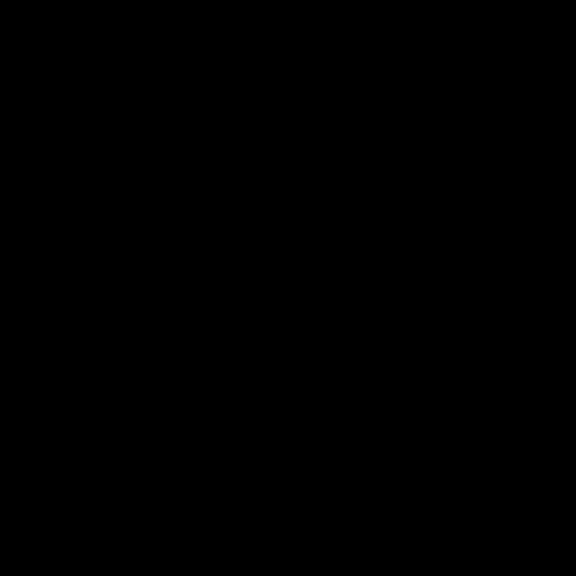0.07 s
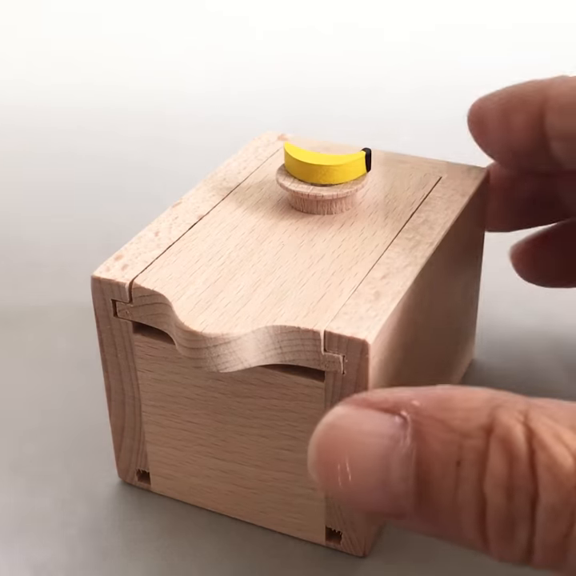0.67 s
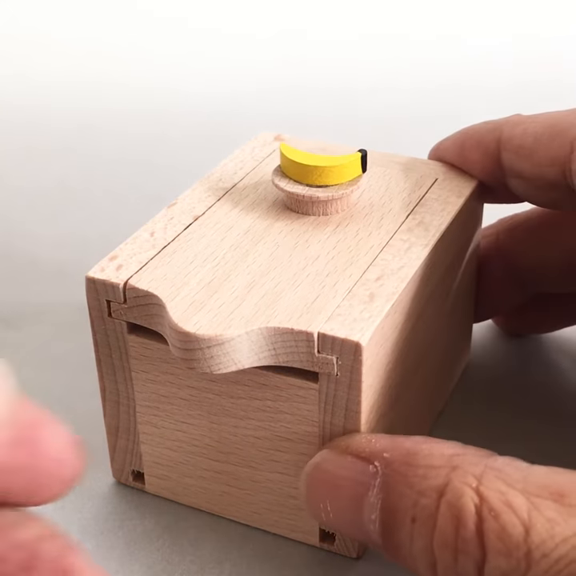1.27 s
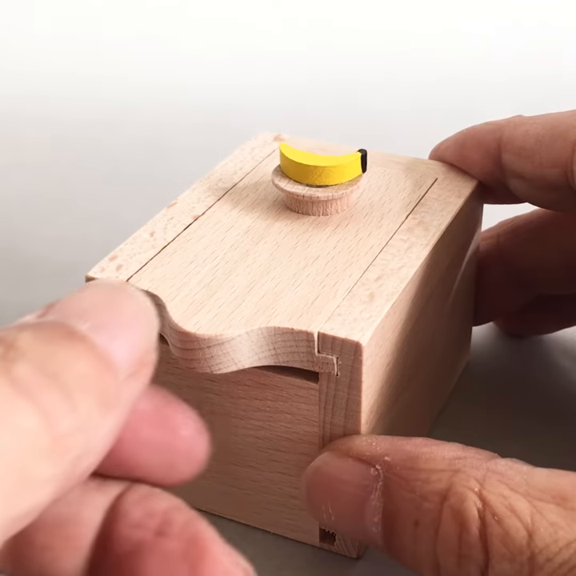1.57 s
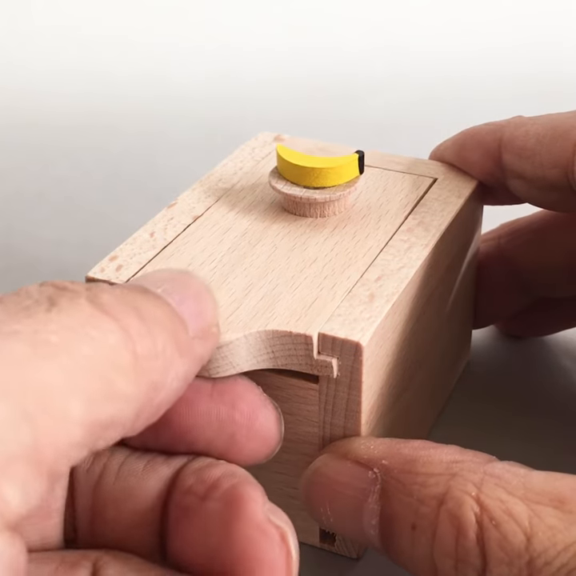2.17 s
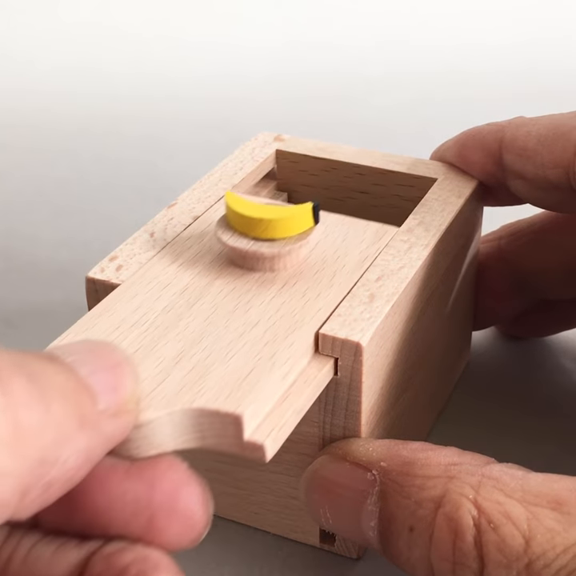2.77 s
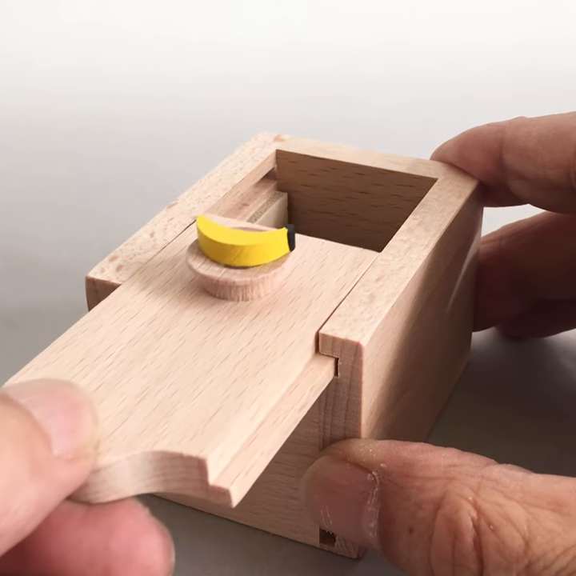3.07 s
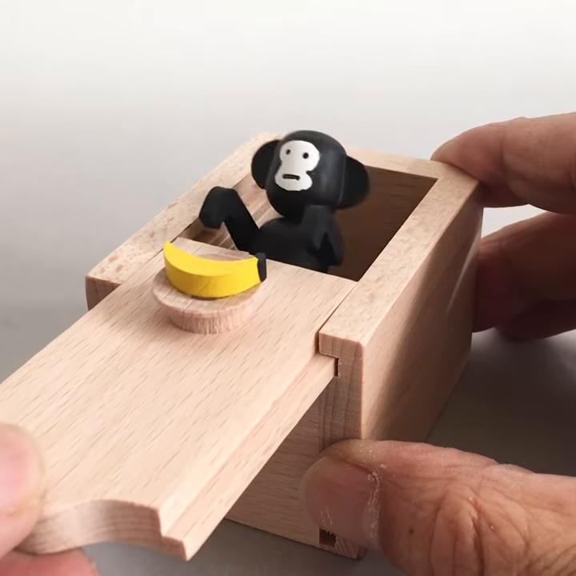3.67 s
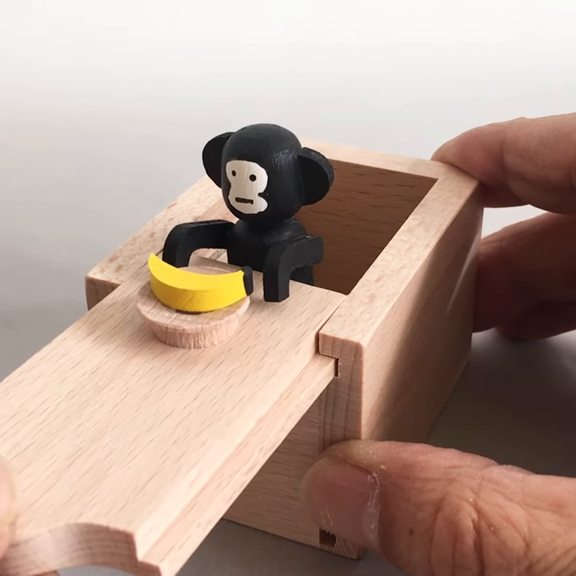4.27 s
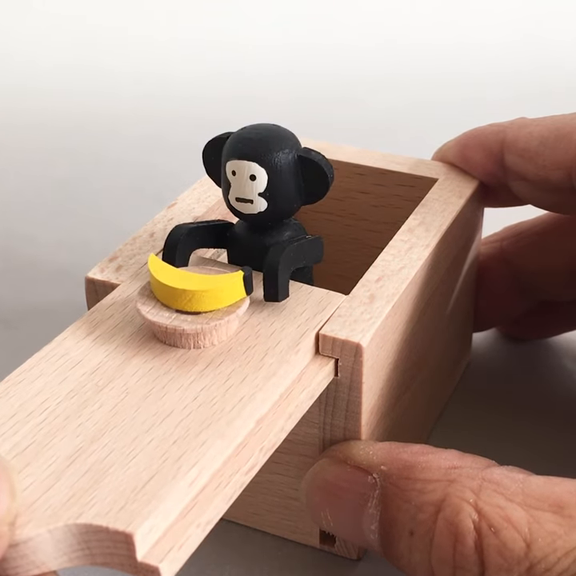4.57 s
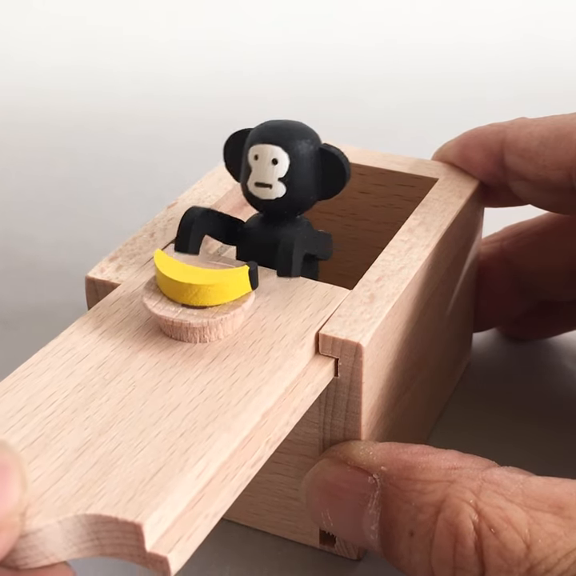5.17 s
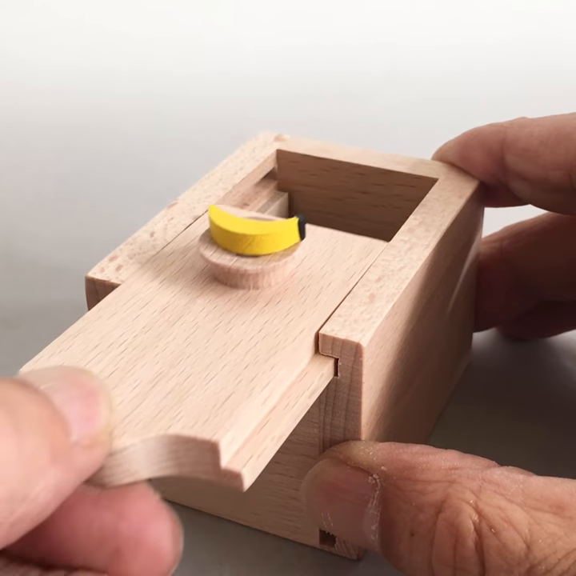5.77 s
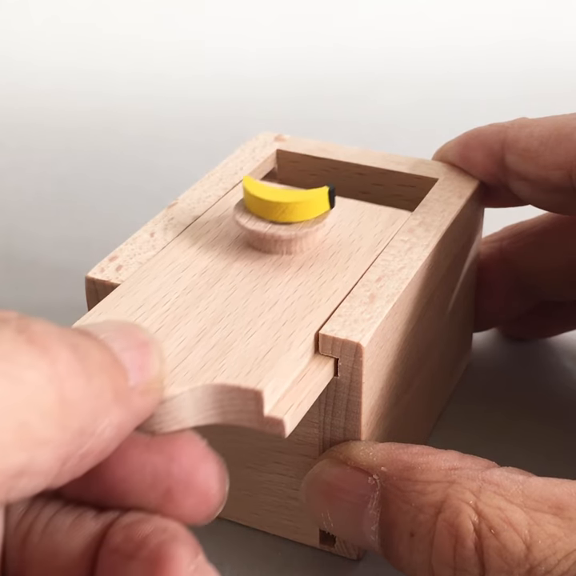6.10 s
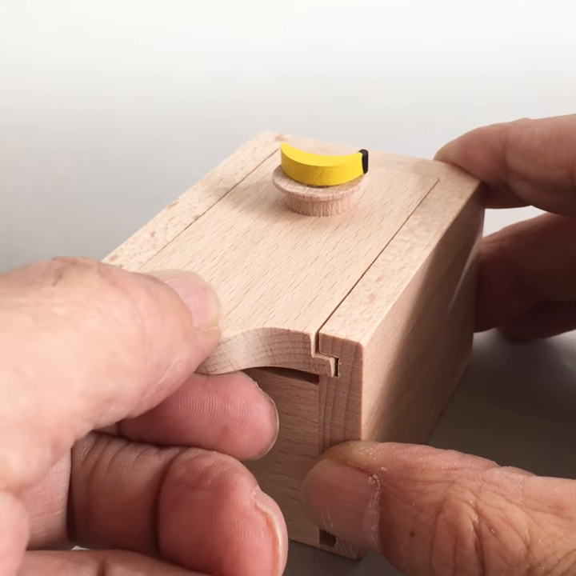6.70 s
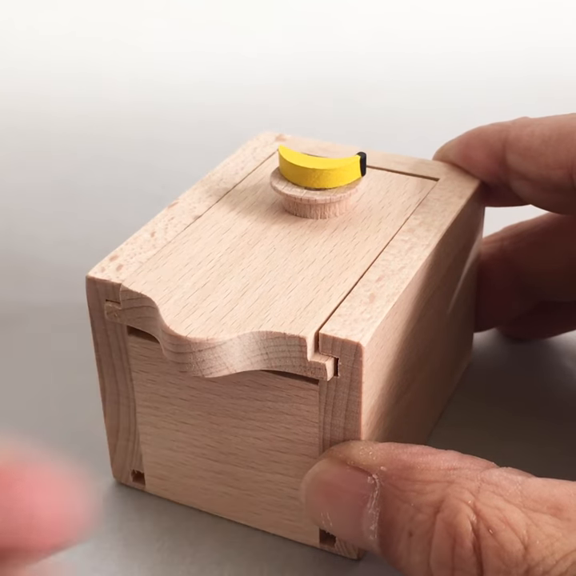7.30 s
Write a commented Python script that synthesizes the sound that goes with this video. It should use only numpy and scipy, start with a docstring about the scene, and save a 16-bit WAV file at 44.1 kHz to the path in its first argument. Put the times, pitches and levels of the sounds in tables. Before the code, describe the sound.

A quiet room's faint hush fades in. From about 0.6 seconds, fingers brush and grip a small wooden box close to the microphone, with light scuffs. Around 2 seconds the lid gives a soft bump, then slides open with a dry wooden rubbing, strongest between 2.5 and 3 seconds. At 3.5 seconds a toy figure pops up with a clear knock, followed by small taps and ticks of its joints until about 4.2. The holding hands make a soft, low rumble. From 5.3 seconds the lid slides back, and at 5.7 the figure drops inside with a sharp clack, by far the loudest sound, briefly overloading the microphone. The rubbing continues until the lid shuts with light bumps near 6.7 seconds. Another small tap comes at 7.1, and the hand brushes away.

```python
"""A quiet room's hush fades in, and fingers brush and grip a small wooden trick box close by on a table.
The lid slides open, friction in its grooves exciting the modes of the wood, and a toy figure swings up
with a knock and small ticks of its joints. The lid is pushed back, the figure drops in with an impact
loud enough to overload the microphone, the lid shuts and the hand brushes away."""
import sys
import numpy as np
from scipy import signal
from scipy.fft import rfft, irfft, next_fast_len
from scipy.io import wavfile

SR = 44100
rng = np.random.default_rng(int(sys.argv[2]) if len(sys.argv) > 2 else 0)


def digitize_waveform(pressure):
    """Quantize a signal to 16-bit integers and store it at the path in sys.argv[1].

    Rows of a 2-D input are taken as channels; values are limited to [-1, 1].
    """
    field = np.atleast_2d(pressure).T
    bounded = np.clip(field, -1, 1)
    quanta = np.round(bounded * 32767).astype(np.int16)
    wavfile.write(sys.argv[1], SR, quanta)


N = 323694
TIME = np.arange(N) / SR
RING_TIME = np.arange(SR // 3) / SR


def from_db(db):
    """Amplitude ratio of a level in decibels."""
    return 10 ** (np.asarray(db) / 20)


def rms_one(x):
    """Normalisation to unit rms."""
    return x / np.sqrt(np.mean(x ** 2) + 1e-20)


def cut(x, hz, kind, order=2):
    """Butterworth low- or high-pass filtering."""
    return signal.sosfilt(signal.butter(order, min(hz, .45 * SR), kind, fs=SR, output="sos"), x)


def split(x, hz, order):
    """Zero-phase crossover: the parts below and above hz, each at unit rms."""
    forward = cut(x, hz, "low", order)
    low = cut(forward[::-1], hz, "low", order)[::-1]
    return rms_one(low), rms_one(x - low)


def coloured(x, spectrum):
    """Spectral weighting, falling 20 dB per octave beyond the table's ends; unit rms."""
    hz, db = np.transpose(spectrum)
    size = next_fast_len(N)
    octave = np.log2(np.maximum(np.fft.rfftfreq(size, 1 / SR), 1))
    known = np.log2(hz)
    beyond = np.abs(octave - np.clip(octave, known[0], known[-1]))
    gain = from_db(np.interp(octave, known, db) - 20 * beyond)
    return rms_one(irfft(rfft(x, size) * gain, size)[:N])


def shaped(x, bands):
    """Resonance and antiresonance: narrow bands are raised or lowered."""
    for hz, width_hz, db in bands:
        x = x + (from_db(db) - 1) * signal.lfilter(*signal.iirpeak(hz, hz / width_hz, fs=SR), x)
    return x


def resonance(x, hz, width_hz):
    """Forced response of a resonator whose natural frequency may move; unit rms."""
    carrier = np.exp(2j * np.pi * np.cumsum(hz) / SR)
    return rms_one(np.real(carrier * cut(x / carrier, width_hz / 2, "low")))


def disperse(x, hz, width_hz):
    """Dispersion of bending waves: an all-pass filter delays those near hz."""
    radius = np.exp(-np.pi * width_hz / SR)
    poles = [1, -2 * radius * np.cos(2 * np.pi * hz / SR), radius * radius]
    return signal.lfilter(poles[::-1], poles, x)


def flicker(per_s, spread_db):
    """Random amplitude modulation: a gain that wanders about unity."""
    steps = rng.standard_normal(4096)
    wander = rms_one(np.interp(TIME * per_s, np.arange(len(steps)), steps))
    return from_db(spread_db * wander)


def stick_slip(per_s, spread_db):
    """Stick-slip friction as a Poisson train of uneven impulses; unit rms."""
    impulses = (rng.random(N) < per_s / SR) * rng.standard_normal(N)
    return rms_one(impulses * from_db(spread_db * np.clip(rng.standard_normal(N), -2, 2)))


def decay(t60):
    """Exponential damping by 60 dB in t60 seconds."""
    return from_db(-60 * RING_TIME / t60)


def ring(modes, vary_db):
    """Superposition of damped modes; each blow shares its force differently among them."""
    hz, db, t60 = np.transpose(modes)[:, :, None]
    strength = from_db(db + vary_db * rng.standard_normal(db.shape))
    return np.sum(strength * decay(t60) * np.cos(2 * np.pi * hz * RING_TIME), axis=0)


def add(track, s, sound, level_db):
    """Superposition of a transient at time s, scaled by the rms of its first 10 ms."""
    start = int(s * SR)
    part = sound[:N - start]
    track[start:start + len(part)] += from_db(level_db) * part / np.std(sound[:SR // 100])


def stroke_gain(rows):
    """Amplitude envelope of a stroke, closing within 3 ms beyond its ends."""
    s, db = np.transpose(rows)
    gate = np.clip(1 + np.minimum(TIME - s[0], s[-1] - TIME) / .003, 0, 1)
    return gate * from_db(np.interp(TIME, s, db))


def swells(rows):
    """Raised-cosine envelopes, with widths at half height; one gain curve per level column."""
    gains = 0
    for s, width, *db in rows:
        bell = np.cos(np.pi / 2 * np.clip((TIME - s) / width, -1, 1)) ** 2
        gains = gains + np.outer(from_db(db), bell)
    return gains


# Spectrum of the room's hush: f/Hz, relative level/dB
HUSH_SPECTRUM = [(12, -43), (20, -24), (49, 4.5), (70, -2.5), (162, -10), (221, -7), (292, -9),
                 (431, -14.5), (843, -20), (969, -19.5), (1280, -23), (2300, -23.5), (4890, -28),
                 (9300, -30), (15800, -34.5)]
def room_hush(level_db=-45.5):
    """Stationary ambient noise, strongest in the bass."""
    return from_db(level_db) * coloured(rng.standard_normal(N), HUSH_SPECTRUM)


def reflections(x, wet_db, t60, wall_hz, delay_s):
    """Reverberation: the table and near walls return a short, dull, diffuse tail."""
    onset = np.clip(RING_TIME / delay_s - 1, 0, 1)
    tail = rng.standard_normal(len(RING_TIME)) * decay(t60) * onset
    tail = cut(tail / np.linalg.norm(tail), wall_hz, "low", order=1)
    return from_db(wet_db) * signal.fftconvolve(x, tail)[:N]


# Low swells of the holding hands shifting, and the loud clack's thump: centre t/s, width/s, level/dB
RUMBLE_SWELLS = [(0.69, 0.051, -49), (0.93, 0.5, -51.5), (1.7, .08, -46), (1.88, 0.055, -48),
                 (2.0, 0.056, -50), (4.01, .08, -40), (4.15, 0.072, -36), (4.35, .3, -47),
                 (4.56, 0.093, -32), (4.75, 0.096, -33.5), (4.87, 0.077, -37.5), (5.15, 0.086, -35.5),
                 (5.28, 0.089, -40), (5.4, 0.19, -46), (5.71, 0.076, -39.5), (7.17, 0.043, -30.5),
                 (7.28, 0.11, -41.5)]
# Spectrum of the rumble: f/Hz, relative level/dB
RUMBLE_SPECTRUM = [(30, -22), (55, -8.5), (75, -1), (95, 0.5), (125, -9.5), (160, -11), (280, -24),
                   (380, -22), (520, -35.5)]
def low_rumble(hold_db=-53.5):
    """Compliant contact: soft hands transmit only a low rumble; one swell is the loud clack's thump."""
    swell, = swells(RUMBLE_SWELLS)
    return (from_db(hold_db) + swell) * coloured(rng.standard_normal(N), RUMBLE_SPECTRUM)


# High resonances of the thin boards: f/Hz, bandwidth/Hz, gain/dB
BOARD_RESONANCES = [(1160, 90, 4.5), (2315, 180, 3.5), (3740, 320, 3), (4550, 200, 4), (5630, 420, 3.5),
                    (6400, 550, 2.5), (9350, 500, 1)]
def rubbed(spectrum):
    """Roughness noise: countless fine slips merge into a hiss coloured by the boards; unit rms."""
    return coloured(shaped(rng.standard_normal(N), BOARD_RESONANCES), spectrum)


# Hiss of the moving skin, standing for its speed, one curve a stroke: t/s, level/dB
SKIN_STROKES = [
    [(0.604, -40), (0.644, -52), (0.734, -35), (0.892, -36.5), (1.112, -30.5), (1.42, -31.5), (1.526, -37),
     (1.71, -34), (1.878, -42.5), (1.942, -58), (1.95, -48)],
    [(7.12, -42), (7.124, -38.5), (7.2, -31.5), (7.222, -27.5), (7.292, -27.5), (7.34, -31)],
]
# Initial pressure of each stroke: relative level/dB
SKIN_PRESSURES = [1, -3]
# Spectrum of skin on wood: f/Hz, relative level/dB
SKIN_SPECTRUM = [(500, -12.5), (1100, -8), (1400, -6.5), (2000, -3.5), (3500, -3), (6000, 0.5), (7800, 1),
                 (9300, 3), (12000, 0.5), (15800, -8)]
def brushing(rub_db=-14, ease_db_per_s=5, rub_exponent=0.65):
    """Sliding friction of skin: hiss grows with speed faster than the dull rub, whose pressure eases."""
    rub, hiss = 0, 0
    for stroke, pressure_db in zip(SKIN_STROKES, SKIN_PRESSURES):
        speed = stroke_gain(stroke)
        age = np.maximum(TIME - stroke[0][0], 0)
        hiss = hiss + speed
        rub = rub + speed ** rub_exponent * from_db(rub_db + pressure_db - ease_db_per_s * age)
    slips = rubbed(SKIN_SPECTRUM) * flicker(per_s=30, spread_db=1.4)
    dull, fine = split(slips, hz=3740, order=2)
    smooth, sharp = split(fine, hz=10800, order=2)
    lightness = np.minimum(hiss / (rub + 1e-9), 3)   # a light, fast stroke sharpens the very top
    return rub * dull + hiss * (from_db(-1.43) * smooth + from_db(-9) * lightness * sharp)


# Modes of box and lid: f/Hz, relative level/dB, T60/s
BOX_MODES = [(245, -20, 0.15), (325, -25, 0.24), (402, -19.5, 0.12), (489, -20, 0.071), (592, -10.5, 0.049),
             (702, -20.5, 0.089), (902, -5, 0.011), (1154.5, 1, 0.025), (1272, -9, 0.037),
             (1383, -4.5, 0.021), (1468, -6, 0.032), (1580, -4.5, 0.016), (1704, -14, 0.058),
             (2046, -13, 0.026), (2360, -6.5, 0.0097), (2835, -6.5, 0.0091), (3390, -10.5, 0.0049),
             (3900, -5.5, 0.012), (6130, -3, 0.0041), (7440, 11.5, 0.0064)]
def box_ring(vary_db):
    """Impulse response of the box: free vibration of its normal modes."""
    return ring(BOX_MODES, vary_db)


# Rubbing, standing for the lid's speed as it is nudged, pulled out and pushed back: t/s, level/dB
LID_STROKES = [
    [(2.113, -46.5), (2.16, -49.5), (2.21, -59), (2.28, -51), (2.335, -61)],
    [(2.33, -60.5), (2.41, -46.5), (2.46, -45.5), (2.51, -41.5), (2.64, -35.5), (2.8, -35.5), (2.89, -38.5),
     (3.0, -43), (3.16, -49), (3.52, -45), (3.76, -51.5), (4.08, -51), (4.19, -55)],
    [(5.28, -56.5), (5.48, -43), (5.72, -38), (5.98, -40.5), (6.08, -38), (6.27, -38), (6.35, -41),
     (6.53, -47), (6.66, -47), (6.74, -69.5)],
]
# Travel of the lid: t/s, fraction drawn out
LID_TRAVEL = [(2.35, 0), (2.58, 0.07), (2.7, .35), (3.0, 0.78), (3.7, 1), (5.3, 0.8), (5.8, 0.75),
              (6.2, 0.39), (6.5, .16), (6.65, 0.04)]
# Scuffs as the box shifts or lid and figure catch: centre t/s, width/s, ring level/dB, drag level/dB
WOOD_SCUFFS = [(0.616, 0.019, -39, -41.5), (0.636, 0.042, -38, -44.5), (0.675, 0.069, -38.5, -48),
               (0.745, 0.021, -60, -42.5), (0.91, 0.066, -64, -46), (1.01, 0.062, -43, -40.5),
               (1.18, 0.11, -41, -44.5), (1.915, 0.048, -51, -47.5), (2.41, .04, -68, -54),
               (3.09, 0.082, -40.5, -59.5), (3.235, 0.052, -39.5, -58), (3.37, 0.074, -47.5, -55),
               (3.93, .04, -51, -52), (4.06, 0.044, -52, -46), (4.14, 0.067, -76, -49),
               (5.15, 0.17, -53.5, -54), (6.71, 0.042, -58, -42.5), (7.055, 0.087, -45.5, -52)]
# Weighting of the box's ring under friction: f/Hz, relative level/dB
FRICTION_SPECTRUM = [(200, -2.5), (360, 5.5), (600, -1), (850, 7), (1130, 0.5), (1300, -1), (1480, -6),
                     (1850, 3.5), (2300, -4.5), (3000, -4)]
# Spectrum of the hiss in the grooves: f/Hz, relative level/dB
GROOVE_SPECTRUM = [(2000, 3), (3000, -4), (4300, -0.5), (5500, -2.5), (8000, 0), (9600, 0), (11800, -3.5),
                   (15800, -10.5)]
# Faint resonance of the grooves' thin rails: f/Hz, bandwidth/Hz, gain/dB
RAIL_RESONANCE = [(4430, 440, 2.5)]
def sliding_lid(drag_db=-4.5, drag_loss_db=3.5, hiss_db=1, hiss_loss_db=5, ring_loss_db=1.5):
    """Stick-slip in the grooves drives the box; drag, hiss and broad ring weaken as the lid comes out."""
    opening = np.clip(np.interp(TIME, *np.transpose(LID_TRAVEL)), 0, 1)
    gap = np.tanh(opening / 0.33)   # levels off beyond a third of the travel
    speed = sum(stroke_gain(stroke) for stroke in LID_STROKES)
    drag = speed * from_db(drag_db - drag_loss_db * opening)
    # A slow creep hisses more when the lid is nearly shut, less when it is open.
    creep = 1 / (1 + (speed / from_db(-47.5)) ** 4)
    hiss = speed * from_db(hiss_db - hiss_loss_db * opening + 8 * creep * (0.5 - gap))

    unevenness = flicker(per_s=45, spread_db=0.7)
    slips = stick_slip(per_s=12000, spread_db=2.5) * unevenness
    body = coloured(signal.fftconvolve(slips, box_ring(vary_db=0.5))[:N], FRICTION_SPECTRUM)
    low, high = split(body, hz=732, order=4)
    # Cavity and lid rise in pitch as the gap opens, and the note of the lid's free end emerges.
    judder = stick_slip(per_s=4000, spread_db=0) * unevenness
    air = resonance(judder, hz=np.interp(gap, [0, 1], [335, 644]), width_hz=130)
    lid = resonance(judder, hz=np.interp(gap, [0, 1], [938, 1207]), width_hz=117)
    free_end = opening * resonance(judder, hz=np.full(N, 1145), width_hz=61)
    surface = shaped(rubbed(GROOVE_SPECTRUM), RAIL_RESONANCE) * flicker(per_s=45, spread_db=1)

    wood = from_db(1.23 - ring_loss_db * opening) * high + from_db(-7) * lid + from_db(-6.5) * free_end
    running = drag * (low + from_db(-1) * air) + speed * wood + hiss * surface
    scuff_ring, scuff_drag = swells(WOOD_SCUFFS)
    scuffed_wood = from_db(-3.5) * high + from_db(-2.5) * free_end + from_db(-14) * surface
    return running + scuff_drag * low + scuff_ring * scuffed_wood


# Contacts in the figure's joints: t/s, level/dB
JOINT_CONTACTS = [(3.333, -52), (3.345, -50), (3.5115, -45), (3.538, -35.5), (3.549, -51), (3.645, -50),
                  (3.658, -49.5), (3.710, -42.5), (3.806, -51), (3.884, -51), (3.918, -44), (3.932, -47),
                  (4.044, -44), (4.049, -48.5), (5.703, -35), (5.716, -38), (6.471, -43), (7.107, -44.5)]
# Modes of the joints: f/Hz, relative level/dB, T60/s
JOINT_MODES = [(8800, -2, 0.004), (10030, 4, 0.012), (10900, -4.5, 0.018), (11300, -16, 0.011),
               (12100, -19, 0.0039)]
def figure_ticks():
    """Free vibration of small parts: high and brief, at a slightly different pitch on each contact."""
    out = np.zeros(N)
    for s, level_db in JOINT_CONTACTS:
        detune = rng.uniform(.97, 1.04)
        tick = ring(np.multiply(JOINT_MODES, [detune, 1, 1]), vary_db=2.5)
        add(out, s, cut(tick, 5800, "high"), level_db)
    return out


# The held lid bumping in its grooves: t/s, level/dB before the high-pass, f/Hz
LID_IMPACTS = [(1.989, -36, 335), (2.033, -27, 352), (2.44, -33.5, 384), (2.592, -28, 383),
               (2.637, -29.5, 474), (3.547, -27.5, 345), (6.628, -31.5, 327), (6.673, -28.5, 518),
               (7.075, -30, 340)]
def lid_bumps():
    """Damped oscillation: held by the fingers, the lid gives a round tock with little of the box's ring."""
    out = np.zeros(N)
    for s, level_db, hz in LID_IMPACTS:
        tock = np.sin(2 * np.pi * hz * RING_TIME) * decay(t60=0.041)
        box = cut(box_ring(vary_db=6), 610, "low", order=4)
        bump = rms_one(tock) + from_db(-5.5) * rms_one(box)
        add(out, s, cut(bump, 960, "low"), level_db)
    return cut(out, 320, "high")


# Wood striking wood: t/s, level/dB before the high-pass, contact bandwidth/Hz, relative crack level/dB
WOOD_IMPACTS = [(0.605, -42, 1390, -20), (2.031, -30.5, 870, -25), (2.114, -43, 4000, 3),
                (2.508, -40, 1290, -28), (3.5426, -16, 3030, -19), (3.595, -38.5, 2500, -6),
                (3.782, -36.5, 2400, -7.5), (3.8842, -39.5, 1090, -3.5), (3.936, -38, 566, -19),
                (4.051, -35.5, 770, -19), (4.148, -44, 1700, 4), (4.177, -45, 1700, -2),
                (5.691, -1, 4480, -30.5), (5.708, -18.5, 2600, -21), (6.669, -39, 2000, -18),
                (7.072, -35, 990, -36)]
def knocks():
    """Impact excitation: the harder the contact, the higher the modes it reaches; noise adds a crack."""
    out = np.zeros(N)
    for s, level_db, contact_hz, crack_db in WOOD_IMPACTS:
        blow = rms_one(cut(box_ring(vary_db=1.9), contact_hz, "low", order=4))
        blow = disperse(blow, hz=1223, width_hz=445)
        blow = disperse(blow, hz=397, width_hz=470)
        burst = rng.standard_normal(len(RING_TIME)) * decay(t60=0.0068)
        crack = cut(cut(burst, 1700, "high"), 7300, "low")
        add(out, s, blow + from_db(crack_db) * rms_one(crack), level_db)
    return cut(out, 192, "high")


def scene():
    """Superposition at one close microphone: the impacts, their reflections, friction and room noise."""
    impacts = knocks() + lid_bumps() + figure_ticks()
    hush = room_hush()
    reflected = reflections(impacts, wet_db=-16.5, t60=0.2, wall_hz=5000, delay_s=0.0018)
    mono = impacts + reflected + brushing() + sliding_lid() + low_rumble() + hush
    return np.array([mono, mono])


# Dips in the microphone's response: f/Hz, bandwidth/Hz, gain/dB
MICROPHONE_DIPS = [(2940, 310, -1.5), (4810, 350, -4), (7720, 746, -2.5), (10370, 620, -3.5)]
# Opening fade, its last gain held: t/s, gain/dB
FADE_CURVE = [(0.12, -59), (0.145, -14.5), (0.3, -5), (0.5, -2)]
def record(dry, cutoff_hz=15900):
    """Transduction: the sound is coloured, faded in, clipped at the loudest clack and band-limited."""
    picked_up = cut(shaped(dry, MICROPHONE_DIPS), 31.6, "high")
    faded = picked_up * from_db(np.interp(TIME, *np.transpose(FADE_CURVE)))
    clipped = np.clip(faded, -1, 1)
    return signal.sosfilt(signal.ellip(12, .1, 70, cutoff_hz, fs=SR, output="sos"), clipped)


dry = scene()
out = record(dry)
digitize_waveform(out)
```